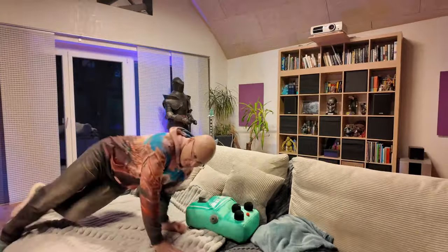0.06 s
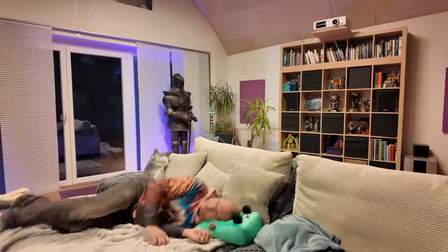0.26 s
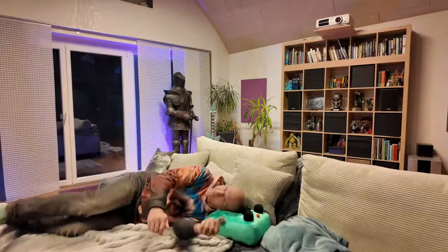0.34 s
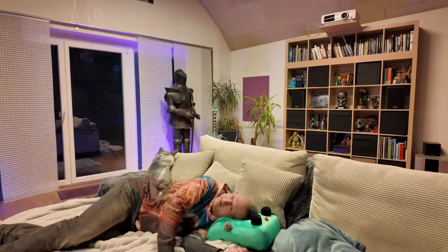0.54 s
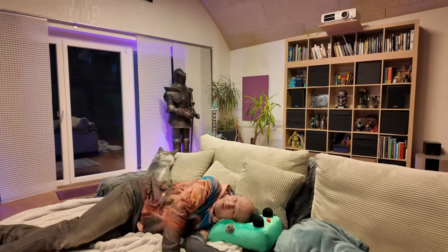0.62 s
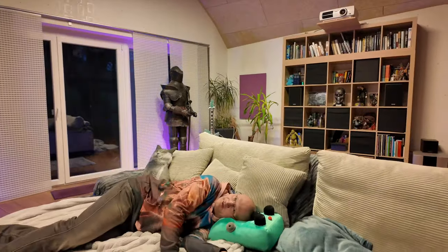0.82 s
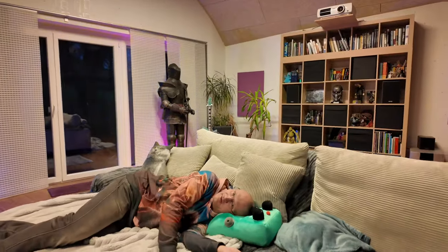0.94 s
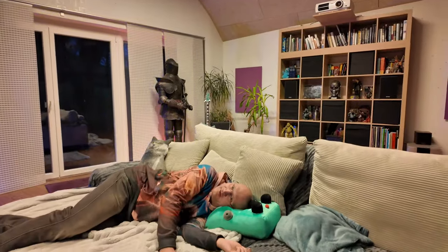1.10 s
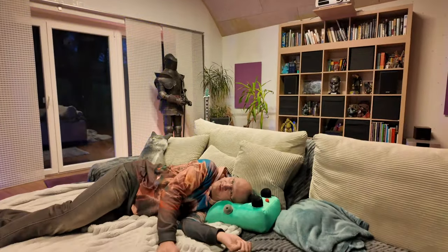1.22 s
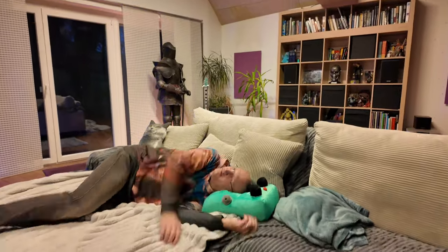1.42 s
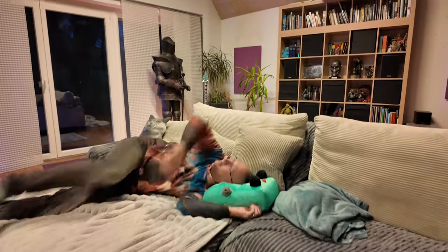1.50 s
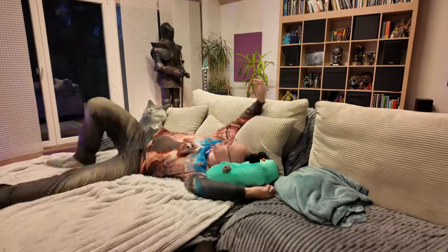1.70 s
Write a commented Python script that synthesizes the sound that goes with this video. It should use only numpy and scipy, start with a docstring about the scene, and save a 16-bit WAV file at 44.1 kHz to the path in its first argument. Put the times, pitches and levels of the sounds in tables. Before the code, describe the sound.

A person flops onto a large padded sofa: a soft first bump and cloth rub at 0 s, then a tight burst of heavy, dull thumps, cushion slaps and hollow knocks at 0.2-0.4 s. A small settling bump follows near 0.5 s. Stillness with faint hum and hiss lasts until 1.45 s, when a softer thump and fabric rustle mark a roll, with faint bumps around 1.7 s. Dry, quiet room.

```python
"""In a quiet living room a person flops onto a big sofa, lies still, then rolls over.
Knees, hips and trunk thump the padded frame: low decaying modes plus a shake of stuffing noise.
Cushions puff as they are slapped flat (swelling bursts of noise) and knock (short, hollow modes).
Clothes slide over the covers as snagging noise, lifted at the pitch of the weave.
A faint mains hum of wavering sines, low air and hiss stay underneath."""
import sys
import numpy as np
from scipy import signal
from scipy.fft import rfft, irfft
from scipy.io import wavfile

SR = 44100
rng = np.random.default_rng(int(sys.argv[2]) if len(sys.argv) > 2 else 0)


def digitize_waveform(pressure):
    """Quantize a signal to 16-bit integers and store it at the path in sys.argv[1].

    Rows of a 2-D input are taken as channels; values are limited to [-1, 1].
    """
    field = np.atleast_2d(pressure).T
    bounded = np.clip(field, -1, 1)
    quanta = np.round(bounded * 32767).astype(np.int16)
    wavfile.write(sys.argv[1], SR, quanta)


N = 77175  # length in samples

# How alike left and right are in the sofa's noises.
# Each row: frequency in Hz, likeness (1 is the same in both, 0 is unrelated).
SOFA_ALIKE = [(60, 1), (180, 0.98), (450, .93), (1000, 0.43), (2000, 0.45), (7000, .1), (15000, 0.068)]


def amp(db):
    """Decibels to gain."""
    return 10 ** (np.asarray(db) / 20)


def unit(x):
    """Scales to rms 1."""
    return x / np.sqrt(np.mean(x ** 2) + 1e-20)


def read(points, hz):
    """Reads a table along a log-frequency axis."""
    f, value = np.transpose(points)
    return np.interp(np.log(hz + 1), np.log(f), value)


def bins():
    """Frequencies in Hz of the full-length spectrum."""
    return np.fft.rfftfreq(N, 1 / SR)


def since(start):
    """Seconds since start, zero before it."""
    return np.maximum(np.arange(N) / SR - start, 0)


def noise():
    """Two channels of white noise."""
    return rng.standard_normal((2, N))


def colour(pair, shape_db, likeness):
    """Gives two unrelated noises a spectrum and the likeness of two close microphones."""
    mid, side = rfft(pair)
    alike = np.clip(read(likeness, bins()), -0.5, 0.9997)
    mid = mid * np.sqrt(1 + alike)
    side = side * np.sqrt(1 - alike)
    left_right = np.array([mid + side, mid - side])
    return unit(irfft(left_right * amp(shape_db), N))


def room_tone():
    """Low still air, a faint hum of wavering sine harmonics and an even hiss."""
    # Spectrum of the low air. Each row: frequency in Hz, relative level in dB per Hz.
    air_spectrum = [(55, -10.5), (100, 3), (170, -4), (280, -7.5), (450, -7.5), (750, -17), (2000, -38.5)]
    # Spectrum of the hiss. Each row: frequency in Hz, relative level in dB per Hz.
    hiss_spectrum = [(300, -1.5), (1500, -1.5), (3000, -4), (7000, -10), (9300, -12.5), (11500, -16.5),
                     (15700, -6.5)]
    # Left-right likeness in the still room. Each row: frequency in Hz, likeness.
    still_alike = [(60, 0.36), (120, 0.24), (300, 0), (1500, 0.3), (5000, 0)]
    # Hum harmonics. Each row: multiple of the hum pitch, level in dB before the level curve and at
    # the crest of the waver, time of a crest in seconds.
    harmonics = [(3, -70.5, 0.9), (4, -67, 0.92), (5, -77, 0.68)]
    # Level curve: the low air, and less deeply the hum, is heard to sink and come back; the hiss
    # holds steady. Each row: time in seconds, level change in dB.
    level_curve = [(0.2, 5), (0.64, -20), (0.78, -7.5), (0.9, -3), (1.15, 1), (1.4, -3)]
    hum_curve_share = 0.33  # share of the level curve, in dB, heard in the hum
    hum_hz, waver_db, wavers_per_s = 100, 7, 0.98
    air_db, hiss_db = -62.5, -67

    t = np.arange(N) / SR
    curve_db = np.interp(t, *np.transpose(level_curve))
    hum = 0
    for multiple, db, strongest in harmonics:
        hz = round(multiple) * hum_hz
        waver = -waver_db * np.sin(np.pi * wavers_per_s * (t - strongest)) ** 2
        level = amp(db + waver + hum_curve_share * curve_db)
        hum = hum + level * np.sqrt(2) * np.sin(2 * np.pi * (hz * t + rng.random()))
    low_air = amp(air_db + curve_db) * colour(noise(), read(air_spectrum, bins()), still_alike)
    hiss = amp(hiss_db) * colour(noise(), read(hiss_spectrum, bins()), still_alike)
    return hum + low_air + hiss


def room(x):
    """The short, soft tail of a furnished room, as decaying noise."""
    t60 = 0.037  # s
    tail = noise() * amp(-60 * since(0) / t60)
    return signal.fftconvolve(x, tail / np.linalg.norm(tail[0]), axes=1)[:, :N]


def slide(at, db, rise, fall, weave_hz, lift_db, width, tilt_db, pan_db):
    """Fibres snag and slip in a stroke that swells and dies; the weave lifts one band."""
    # Spectrum of rubbed cloth. Each row: frequency in Hz, relative level in dB per Hz.
    cloth = [(40, -7), (200, -1), (550, 3.5), (900, 2.5), (1600, 1), (2700, -3), (3800, -1.5), (6000, -8),
             (9500, -8.5), (11500, -16), (15500, -19)]
    snags_per_s, snag_spread_db, snag_share = 2000, 2.5, 0.39  # share of the rub's power

    t = np.arange(N) / SR - at
    octaves = np.log2((bins() + 1) / weave_hz)
    snag_here = rng.random((2, N)) < snags_per_s / SR
    snag_db = snag_spread_db * np.minimum(rng.exponential(1, (2, N)), 4)
    snags = noise() * snag_here * amp(snag_db)
    grain = np.sqrt(snag_share) * unit(snags) + np.sqrt(1 - snag_share) * noise()
    weave_db = lift_db * np.exp(-(octaves / width) ** 2)
    shape_db = read(cloth, bins()) + weave_db + tilt_db * octaves
    stroke = np.exp(-np.where(t < 0, (t / rise) ** 2, t / fall))
    pan = pan_db * np.array([[0.5], [-0.5]])
    return amp(db + pan) * stroke * colour(grain, shape_db, SOFA_ALIKE)


def slap(start, db, rise, t60, pitch):
    """Air and cloth are driven out of a cushion in one dull puff, which the body then smothers."""
    # Spectrum of a puff at its usual pitch. Each row: frequency in Hz, relative level in dB per Hz.
    puff = [(40, -27.5), (200, -5.5), (340, -6), (480, 2), (720, 0.5), (880, 5), (1230, -4.5), (1450, -14),
            (2100, -27), (5000, -42), (15000, -64.5)]
    smother = 1.477  # above 1 the decay steepens as it goes
    t = since(start)
    swell = 1 - np.exp(-(2 * t / rise) ** 2)
    decay = amp(-60 * (np.maximum(t - rise, 0) / t60) ** smother)
    return amp(db) * swell * decay * colour(noise(), read(puff, bins() / pitch), SOFA_ALIKE)


def knock(start, db):
    """A hard part of the body lands through the cushion and rings a few short, hollow modes."""
    # The hollow modes. Each row: pitch in Hz before detuning, level in dB, t60 in seconds.
    hollow = [(710, -6.5, .09), (897, -0.5, .09), (1036, -5, 0.052), (1189, -3, 0.056)]
    rise_s, detune = 0.00085, 0.021  # detune is the largest random shift, as a share of the pitch
    t = since(start)
    hz, mode_db, t60 = np.transpose(hollow)[:, :, None]
    hz = hz * (1 + detune * rng.uniform(-1, 1, hz.shape))
    modes = (amp(mode_db - 60 * t / t60) * np.sin(2 * np.pi * hz * t)).sum(0)
    return amp(db) * (1 - np.exp(-t / rise_s)) * modes


def padding(hz, pad_hz, deep_db):
    """Gain in dB of a blow: padding takes the top off, and each blow weights its own deep bass."""
    deep_hz, pad_order = 108, 2.9
    deep = deep_db / (1 + (hz / deep_hz) ** 6)
    top_loss = 10 * np.log10(1 + (hz / pad_hz) ** (2 * pad_order))
    return deep - top_loss


def thump(start, db, pad_hz, ring, deep_db):
    """A padded blow rings the frame's low modes and shakes the stuffing."""
    # The frame's modes. Each row: pitch in Hz, level in dB before padding and balancing,
    # t60 in seconds at a ring of 1.
    frame_modes = [(63.5, 3, 0.25), (84.7, -5, 0.32), (129.4, -2.5, 0.25), (163.6, 3, 0.21),
                   (201.5, -10, 0.6), (239.6, 1.5, 0.17), (368.4, -10.5, 0.092), (470, -11, 0.33)]
    # Spectrum of the shaken stuffing. Each row: frequency in Hz, relative level in dB per Hz.
    stuffing_spectrum = [(36, -32), (55, -1.5), (160, 2.5), (250, -4), (305, -15), (400, -6.5), (600, -20),
                         (1000, -52.5)]
    contact_s = 0.0039  # softness of the onset
    stuffing_db, stuffing_t60 = -5, 0.26  # beside the modes; s at a ring of 1

    t = since(start)
    hz, mode_db, t60 = np.transpose(frame_modes)[:, :, None]
    weight = amp(mode_db + padding(hz, pad_hz, deep_db))
    ringing = weight * amp(-60 * t / (t60 * ring)) * np.sin(2 * np.pi * hz * t)
    modes = ringing.sum(0) / np.linalg.norm(weight)
    shape_db = read(stuffing_spectrum, bins()) + padding(bins(), pad_hz, deep_db)
    shake = amp(stuffing_db - 60 * t / (stuffing_t60 * ring))
    stuffing = shake * colour(noise(), shape_db, SOFA_ALIKE)
    onset = 1 - np.exp(-(t / contact_s) ** 2)
    return amp(db) * onset * (modes + stuffing)


def scene():
    """Cloth, cushions and frame over the room tone; the frame's thumps get no room tail."""
    # Cloth sliding. Each row: time of the fullest stroke in seconds, level in dB, rise in seconds,
    # fall in seconds, pitch of the weave in Hz, its lift in dB, its width in octaves,
    # treble tilt in dB per octave, left over right in dB.
    slides = [(0.01, -48.5, 0.099, 0.066, 3230, 0, 0.52, -1, 2),
              (0.145, -52.5, 0.085, 0.13, 505, 13, 0.78, -0.24, 2.5),
              (0.239, -40, 0.024, 0.049, 7050, 1, 0.34, -0.5, 2.5),
              (0.267, -35.5, 0.0019, 0.0081, 7460, 18, 0.49, -2, -13),
              (0.264, -40, 0.0041, 0.0089, 3600, 11.5, .2, 2.5, -4.5),
              (0.318, -58.5, 0.023, 0.063, 3460, 11.5, 0.8, 1.5, 0),
              (0.485, -59.5, 0.047, 0.02, 9500, 8.5, 0.084, 3.5, 9),
              (0.502, -53, 0.022, 0.043, 3670, 4.5, 0.52, 0, 2),
              (0.505, -53, 0.027, .035, 1538, 23, 0.22, -0.5, 0),
              (1.102, -69, 0.19, 0.23, 1480, 9.5, 0.35, 2, 3),
              (1.452, -38, 0.0088, 0.024, 1752, 23, 0.12, -2, 0),
              (1.452, -47, 0.013, 0.033, 4600, 12.5, 0.56, -2.5, 1.5),
              (1.467, -41.5, 0.021, 0.019, 2290, 19, 0.089, -1.5, 2),
              (1.485, -42.5, 0.0073, 0.067, 4300, 1, .4, -2.5, 1.5),
              (1.63, -62, 0.082, 0.16, 9500, 4.5, 0.081, 3, 7),
              (1.661, -53.5, 0.0077, 0.03, 1880, 10, 0.13, -3, -0.5),
              (1.745, -57.5, 0.1, .05, 3500, 2.5, 0.53, -2.5, 1)]
    # Cushions slapped flat. Each row: start in seconds, level in dB, rise in seconds,
    # t60 in seconds counted from the end of the rise, pitch as a share of the usual.
    slaps = [(0.001, -44, 0.00073, 0.23, 0.54), (0.182, -38.5, 0.025, 0.16, 0.51),
             (0.216, -29, 0.017, 0.084, 0.94), (0.232, -18, 0.0071, 0.093, 1.004),
             (0.2637, -18.5, 0.0023, 0.1, 0.95), (0.275, -22, 0.003, 0.12, 0.55),
             (0.308, -31.5, .004, 0.089, 1.19), (0.331, -28, 0.01, 0.099, .44),
             (0.488, -49, 0.014, 0.15, 0.67), (1.473, -29, 0.004, .1, 0.96),
             (1.485, -33, 0.0035, 0.15, 0.62), (1.519, -43, 0.0028, 0.076, 1.05),
             (1.672, -56.5, 0.0027, 0.17, 1), (1.712, -48.5, 0.016, 0.26, 0.57)]
    # Hollow knocks as the body lands. Each row: start in seconds, level in dB.
    knocks = [(0.2345, -19.5), (0.265, -18)]
    # Blows on the frame. Each row: start in seconds, level in dB, pitch in Hz above which the padding
    # dulls it, ring length as a share of the modes' own, weight of the deep bass in dB.
    thumps = [(0.001, -28, 370, 0.47, -5.5), (0.066, -46.5, 140, 4.3, 8.5), (0.184, -18.5, 119, 1.7, 8.5),
              (0.233, -13, 175, 0.24, -11), (0.254, -4.5, 268, 0.17, -11), (0.269, -6.5, 298, 0.31, -5.5),
              (0.306, -5, 290, 0.53, -18), (0.327, -3, 207, 0.53, -1.5), (0.356, -13.5, 345, 0.5, -24),
              (0.403, -24, 330, 0.53, 1), (0.487, -22, 139, 0.55, 3.5), (0.524, -27, 149.3, 0.29, 0.5),
              (1.461, -19, 200, 0.5, 0.5), (1.485, -18.5, 216, 0.64, 5), (1.536, -24.5, 162, 0.51, -1),
              (1.586, -32.5, 220, 0.25, -23), (1.686, -43, 223, 1.07, -12), (1.704, -33, 168, 1.5, -45),
              (1.715, -29.5, 184, 1.1, -8)]
    room_db = -15

    cloth_rub = sum(slide(*row) for row in slides)
    cushions = sum(slap(*row) for row in slaps) + sum(knock(*row) for row in knocks)
    surface = cloth_rub + cushions
    frame = sum(thump(*row) for row in thumps)
    return room_tone() + amp(room_db) * room(surface) + surface + frame


def record(dry):
    """The microphone's bass roll-off and the band limit."""
    bass_cut = signal.butter(N=4, Wn=44, btype="high", fs=SR, output="sos")
    band_limit = signal.ellip(12, 0.1, 90, 15850, fs=SR, output="sos")  # ripple dB, stop dB, edge Hz
    return signal.sosfilt(band_limit, signal.sosfilt(bass_cut, dry))


dry = scene()
out = record(dry)
digitize_waveform(out)
```